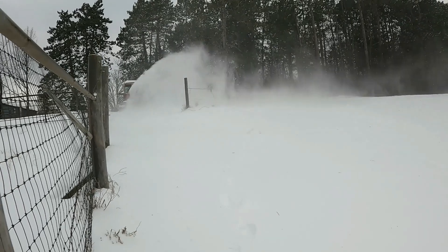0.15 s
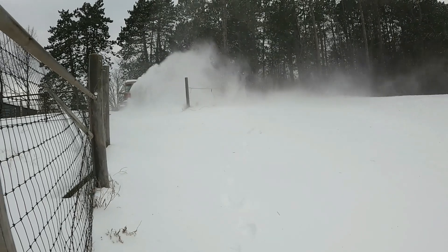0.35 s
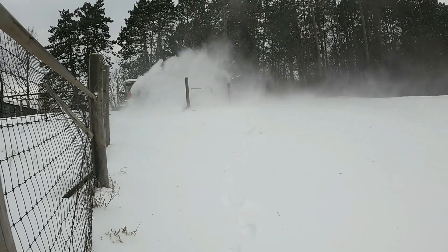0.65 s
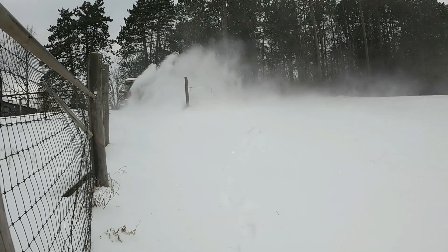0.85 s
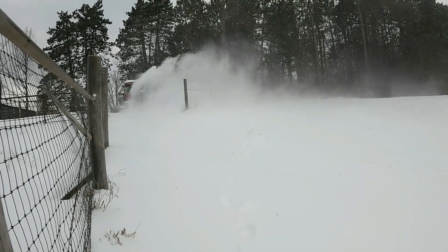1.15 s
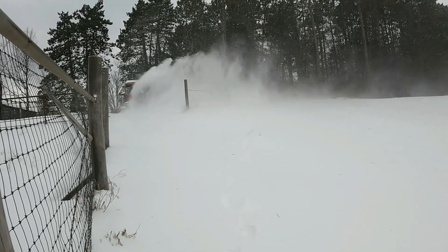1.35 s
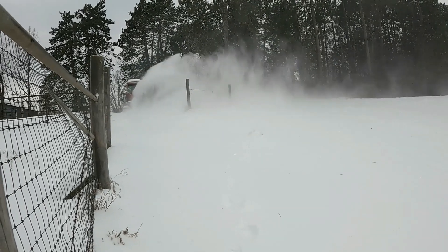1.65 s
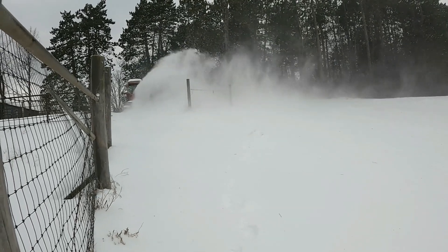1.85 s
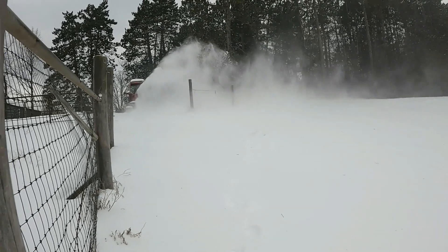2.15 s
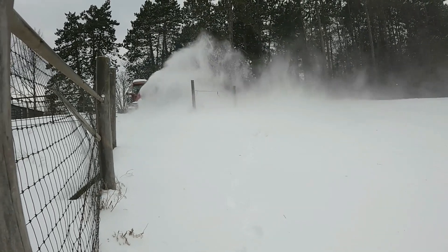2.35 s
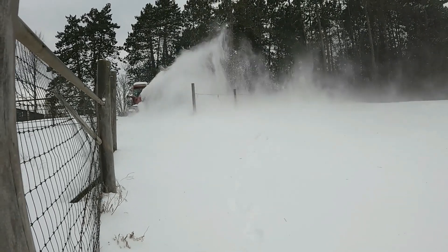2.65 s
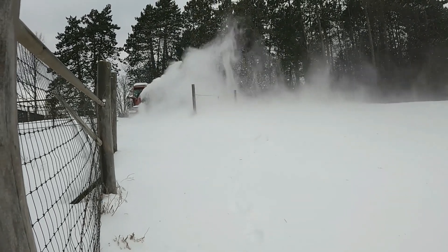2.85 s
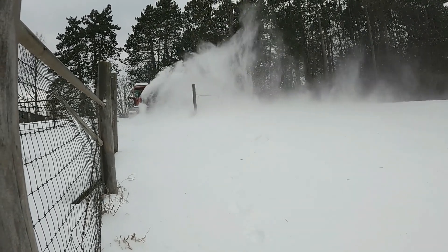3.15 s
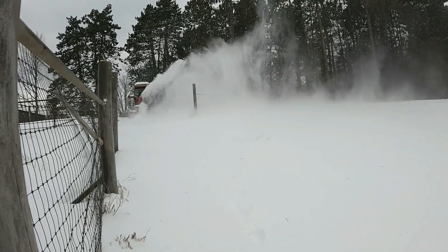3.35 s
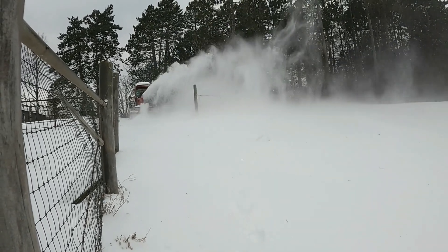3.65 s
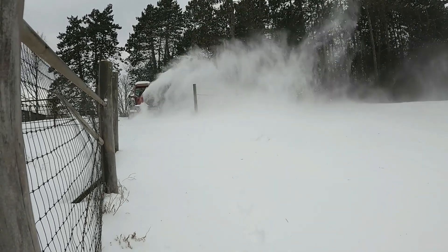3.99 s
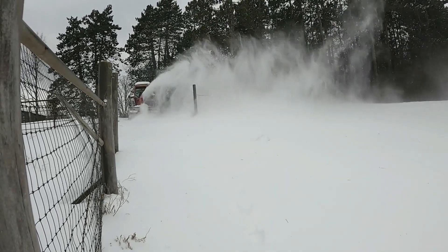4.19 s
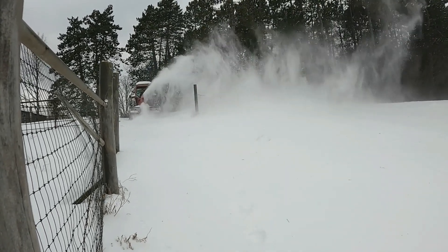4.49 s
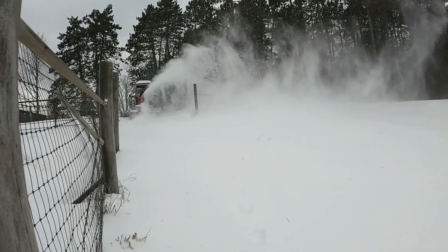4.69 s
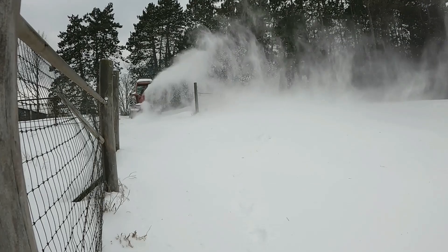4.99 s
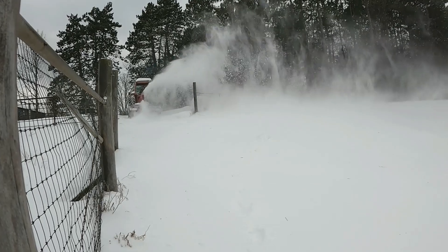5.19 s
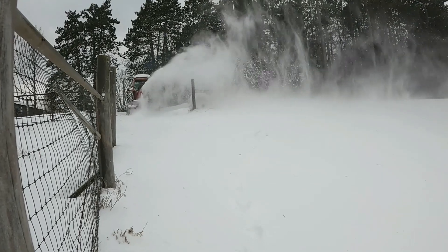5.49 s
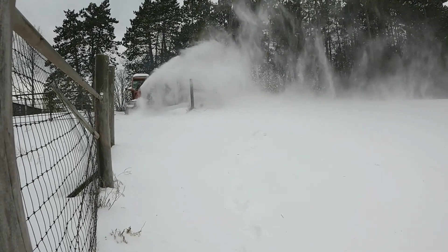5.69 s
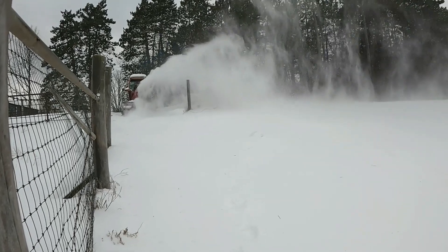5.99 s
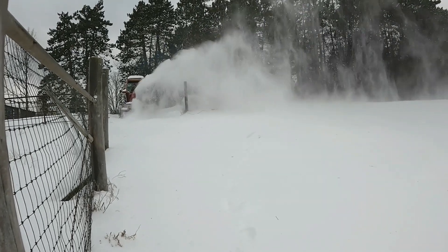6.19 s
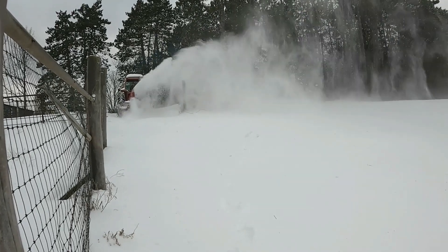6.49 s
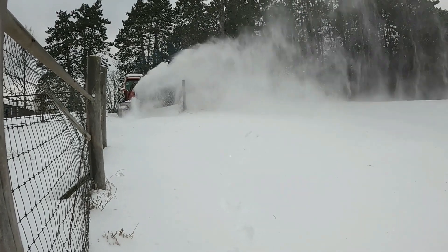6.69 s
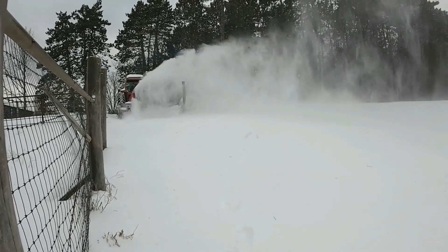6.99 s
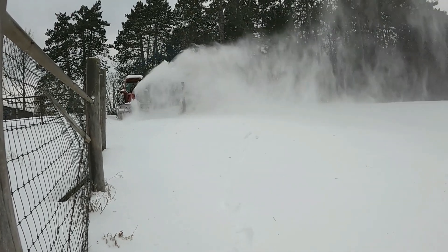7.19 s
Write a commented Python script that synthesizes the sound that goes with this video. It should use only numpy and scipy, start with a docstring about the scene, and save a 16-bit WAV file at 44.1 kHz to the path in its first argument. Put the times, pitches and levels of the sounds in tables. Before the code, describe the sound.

Steady low engine drone with a roaring snow blower some way off, wind thumps early on, metallic rattling growing busier near the end.

```python
"""A tractor's steady boom and whine, roaring and rattling as it blows snow across a field some way off.
The three-cylinder diesel is sines on multiples of its cycle, the exhaust boom on twice the firing rate;
one knock is a short pulse. Roar, snow spray and rumble are shaped noise; loose steel is clicks ringing
short modes. Wind buffets the microphones; one sharp tick sounds close by and the treble swells briefly.
The image is mono but for a faint hiss at first and opens out later."""
import sys
import numpy as np
from scipy import signal
from scipy.io import wavfile

SR = 44100
rng = np.random.default_rng(int(sys.argv[2]) if len(sys.argv) > 2 else 0)


def persist_wave(psi):
    """Save psi, clipped to +-1, as 16-bit WAV."""
    counts = np.round(np.clip(psi, -1, 1) * 32767).astype(np.int16)
    wavfile.write(sys.argv[1], SR, np.atleast_2d(counts).T)


N = 323694

BLOWER_TURNS_PER_CYCLE = .5117   # an engine cycle is two crank turns
LINE_UP_CYCLE = .27   # point of the cycle (0-1) where one cylinder fires hardest and its tones line up

# single pulses, wind thumps and one engine knock: peak t/s, peak level/dB, length/s
PULSES = [(0.472, -18.5, .03), (0.592, -17.5, .034), (0.905, -21, .016), (1.088, -17.5, .026),
          (1.15, -21, .016), (1.205, -15, .034), (1.226, -19, .005), (1.285, -20, .022), (1.334, -17, .018),
          (1.485, -20, .022), (1.675, -25, .006), (1.925, -26, .005)]
KNOCK_S = 1.226   # the row of PULSES that is the knock


def from_db(db):
    """Decibels to gain."""
    return 10 ** (np.asarray(db) / 20)


def rms_one(x):
    """Scale to unit rms."""
    return x / np.sqrt(np.mean(x ** 2) + 1e-20)


def in_time(rows):
    """Curve rows to one per-sample array per column after the time."""
    s, *columns = np.transpose(rows)
    return [np.interp(np.arange(N) / SR, s, c) for c in columns]


def at_hz(points, hz):
    """Read a spectrum on a log-frequency axis."""
    freqs, values = np.array(points).T
    return np.interp(np.log(hz), np.log(freqs), values)


def band_pass(x, low_hz, high_hz, order=2):
    """Butterworth band-pass."""
    return signal.sosfilt(signal.butter(order, [low_hz, high_hz], "band", fs=SR, output="sos"), x)


def bell(peak_s, length_s):
    """Gaussian swell of height 1; length is the full width at 1/e."""
    return np.exp(-(2 * (np.arange(N) / SR - peak_s) / length_s) ** 2)


def pulse(peak_s, peak_db, length_s):
    """A pressure pulse: a push between two pulls."""
    u = (2 * (np.arange(N) / SR - peak_s) / max(length_s, .002)) ** 2
    return from_db(peak_db) * (1 - 2 * u) * np.exp(-u)


def drift(rate_hz):
    """Slow chance: noise through a double one-pole low-pass, made every 64 samples, rms 1."""
    r = np.exp(-2 * np.pi * rate_hz * 64 / SR)
    slow = signal.lfilter([1], [1, -2 * r, r * r], rng.standard_normal(N // 64 + 2002))
    slow = slow[2000:]   # skip the filter's start
    return np.interp(np.arange(N) / 64, np.arange(len(slow)), rms_one(slow))


def ring(clicks, hz, t60_s):
    """A two-pole resonator: a unit click sets a dying sine of initial height 1 ringing."""
    r, w = from_db(-60 / (t60_s * SR)), 2 * np.pi * hz / SR
    return signal.lfilter([0, np.sin(w)], [1, -2 * r * np.cos(w), r * r], clicks + 1e-18)


def banded_noise(spectrum, patchy_db, patch_hz):
    """Third-octave bands of stereo noise, each with its own level, flicker and likeness; rms 1 in mono."""
    # left-right correlation: f/Hz, likeness
    likeness = [(20, 0.11), (60, 0.27), (120, 1), (200, 1), (350, 0.93), (500, 0.93), (2000, 0.83),
                (5000, 0.16), (7500, 0.3), (10000, .9)]
    bottom_hz, top_hz = spectrum[0][0], spectrum[-1][0]
    edges_hz = bottom_hz * 2 ** np.arange(0, np.log2(top_hz / bottom_hz) + .3, 1 / 3)
    out, together, white = 0, drift(patch_hz), rng.standard_normal((2, 2, N))
    for k, (low, high) in enumerate(zip(edges_hz, edges_hz[1:])):
        mid, side = band_pass(white[k % 2], low, high)
        hz = np.sqrt(low * high)
        alike = np.clip(at_hz(likeness, hz), -1, 1)
        flicker_db = patchy_db * (0.48 * together + drift(patch_hz))
        gain = from_db(at_hz(spectrum, hz) + flicker_db)
        out = out + gain * (np.sqrt(1 + alike) * mid + np.sqrt(1 - alike) * side * [[1], [-1]])
    return out / np.sqrt(np.mean(out.mean(0) ** 2))


def tones(turns, table, waver_db, waver_turns, scatter_cycles):
    """Multiples of a shaft rate, lined up once a turn but for a scatter; moving air makes each waver."""
    out = np.zeros(N)
    for multiple, level_db in table:
        wavering_turns = turns + waver_turns * drift(6.9)
        phase = 2 * np.pi * (multiple * wavering_turns + scatter_cycles * rng.standard_normal())
        out += np.sqrt(2) * from_db(level_db + waver_db * drift(4.14)) * np.cos(phase)
    return out


def hiss():
    """Faint high noise, independent in each channel."""
    # hiss level: t/s, level/dB
    hiss_level = [(0, -81), (2.5, -77), (5.0, -79.5), (5.6, -83), (7.34, -80)]
    noise = band_pass(rng.standard_normal((2, N)), 11000, 13500)
    return from_db(in_time(hiss_level)[0]) * rms_one(noise)


def treble_swell():
    """The treble swells faintly and briefly: bright noise under one bell."""
    noise = rms_one(band_pass(rng.standard_normal(N), 6500, 11500))
    return from_db(-66) * bell(peak_s=3.287, length_s=0.047) * noise


def gusty_breeze():
    """Low noise of air buffeting the ports: a lumpy breeze with bell-shaped gusts on top."""
    # gusts: peak t/s, peak level/dB, length/s
    gusts = [(0.1, -37, 0.26), (0.27, -32, 0.087), (0.477, -29, 0.081), (0.598, -28, 0.077),
             (0.885, -28, 0.14), (1.22, -28, 0.5), (1.59, -27, 0.053), (1.74, -34, 0.12), (2.05, -35, 0.21),
             (2.45, -32, 0.12), (2.84, -26, .08), (3.6, -30, 0.072), (3.85, -29, 0.15), (4.072, -27, 0.063),
             (4.3, -34, 0.12), (5.072, -32, 0.14), (5.9, -32.5, 0.99), (6.927, -33, 0.11),
             (7.005, -35, 0.6)]
    # buffet spectrum: f/Hz, relative density/dB
    buffet = [(6, -3.5), (25, 2), (40, -0.5), (60, -2), (90, -9.5), (150, -20), (260, -30), (400, -47.5)]
    breeze_db, lumps_db, lumps_hz = -38, 4, 14
    strength = from_db(breeze_db + lumps_db * drift(lumps_hz))
    for s, peak_db, length_s in gusts:
        strength += from_db(peak_db) * bell(s, max(length_s, .02))
    return strength * banded_noise(buffet, patchy_db=1.5, patch_hz=7.2)


def wind_thumps():
    """Single pressure pulses of wind on the ports."""
    return sum(pulse(*row) for row in PULSES if row[0] != KNOCK_S)


def right_flutter():
    """Bell-shaped bursts of low noise where wind catches the right port alone."""
    # flutters: peak t/s, peak level/dB, length/s
    flutters = [(5.7, -48, .3), (6.05, -32, 0.084), (6.2, -32, 0.17), (7.0, -37, .12), (7.22, -29.5, 0.27)]
    swell = sum(from_db(peak_db) * bell(s, max(length_s, .02)) for s, peak_db, length_s in flutters)
    noise = rms_one(band_pass(rng.standard_normal(N), 50, 260))
    return swell * noise * [[0], [1]]


def wind():
    """All moving air at the ports: breeze and gusts, thumps, flutters."""
    return wind_thumps() + right_flutter() + gusty_breeze()


def tick():
    """Touches close by: clicks with dying crackle ring modes near 5 kHz; faint bright edge."""
    # light touches, main tick, bounce: t/s, click level/dB, fade/s
    touches = [(3.258, -29, .006), (3.2645, -34, .012), (3.2805, -29, .002), (3.2831, -15, .003),
               (3.2893, -20, .0025)]
    # modes: f/Hz, relative level/dB, t60/s
    modes = [(2500, -8, .0015), (3700, -3, .0012), (4800, 0, .0012), (5800, -3.5, .0012), (7200, -11, .001)]
    edge_db = -46
    t, crackle = np.arange(N) / SR, np.zeros(N)
    grit = rng.choice([-1, 1], N) * (rng.random(N) < .3) * .45
    for s, level_db, fade_s in touches:
        crackle += from_db(level_db) * (t > s) * np.exp(-np.abs(t - s) / fade_s) * grit
        crackle[int(s * SR)] += from_db(level_db)
    body = np.zeros(N)
    for k, (hz, level_db, t60_s) in enumerate(modes):
        body += from_db(level_db) * ring(crackle, hz, t60_s) * (-1) ** k   # alternating sign
    body = band_pass(body, 2000, 7500)
    return body + from_db(edge_db) * np.diff(crackle, prepend=0)


def patter():
    """Ice in the chute: sparse grains of uneven size, each a short click near 4 kHz."""
    # grain strength ahead of the band-pass: t/s, level/dB
    grain_level = [(0, -36), (5, -33), (6.3, -27), (7.34, -27)]
    grains_per_s, uneven_db = 70, 3.0
    hits = rng.random(N) < grains_per_s / SR
    grains = hits * from_db(in_time(grain_level)[0] + uneven_db * rng.standard_normal(N))
    return band_pass(grains + 1e-18, 3300, 5200)


def rattle(blower_turns, spray_db):
    """Loose steel: dense random clicks ring its modes, weakly every blower turn, with loud bursts and cracks."""
    # loud bursts: t/s, burst level/dB, crack level/dB, crack top f/Hz, upper modes re lower/dB
    bursts = [(0.918, -32, -40, 5000, 0), (1.68, -34, -42, 5000, 2), (2.9921, -38, -40, 5000, 0),
              (3.8267, -38, -40, 5000, 0), (4.3221, -38, -40, 5000, 0), (4.4134, -36, -40, 6000, 0),
              (5.605, -34, -46, 4200, -8), (5.69, -37, -46, 4200, -8), (5.7723, -35, -44, 4200, -8),
              (5.797, -36, -46, 5000, -1), (5.888, -32, -38, 4200, -8), (5.98, -33, -44, 4200, -8),
              (6.0801, -33, -42, 5000, 0), (6.193, -35, -42, 4500, -5), (6.372, -36, -44, 5000, -2),
              (6.4662, -34, -30, 6500, 3), (6.483, -38, -34, 5200, 2), (6.5625, -31, -40, 4500, -4),
              (6.586, -40, -31, 6500, 3), (6.7575, -39, -36, 5200, 7), (6.8568, -32, -32.5, 8200, -3),
              (6.871, -40, -36, 6200, 2), (6.9636, -34, -38, 5000, -2), (7.053, -38, -40, 5000, 4),
              (7.1636, -37, -31, 5500, 6), (7.258, -38, -38, 5500, 4)]
    # steel modes: f/Hz, relative level/dB, t60/s
    steel = [(2540, -10, 0.016), (3380, -6, 0.011), (3570, 0, 0.016), (3820, -5.5, 0.02), (4250, -9, 0.013),
             (4640, -3.5, 0.014), (4800, -6, 0.012), (5200, -9.5, 0.0088), (5600, -11, 0.0081),
             (7100, -13.5, 0.0079)]
    chatter_db, follows_spray, chatter_waver_db = -58.5, 0.83, 2.0
    drive_db, fade_s, crack_fade_s = -17, 0.021, .0022   # drive: touch strength under the burst level
    upper_hz, touches_per_s = 4000, 4000
    t = np.arange(SR // 5) / SR
    chatter_db = chatter_db + follows_spray * (spray_db - spray_db.mean()) + chatter_waver_db * drift(3.9)
    lower = from_db(chatter_db) * np.exp(-((blower_turns + 0.22) % 1) / 0.37)
    upper, cracks = lower.copy(), np.zeros(N)
    for s, level_db, crack_db, top_hz, upper_db in bursts:
        i = int(s * SR)
        crack = from_db(crack_db) * np.exp(-t / crack_fade_s) * rng.choice([-1, 1], len(t))
        cracks[i:i + len(t)] += band_pass(crack + 1e-18, 3200, top_hz, order=3)[:N - i]
        fade = (from_db(level_db + drive_db) * np.exp(-t / fade_s))[:N - i]
        lower[i:i + len(t)] += fade
        upper[i:i + len(t)] += from_db(upper_db) * fade
    touches = rng.choice([-1, 1], N) * (rng.random(N) < touches_per_s / SR)
    clatter = np.zeros(N)
    for hz, level_db, t60_s in steel:
        drive = upper if hz > upper_hz else lower
        clatter += from_db(level_db) * ring(drive * touches * rng.standard_normal(N), hz, t60_s)
    # the air takes the very top; distance dulls the clatter
    cracks = signal.sosfilt(signal.butter(8, 8400, fs=SR, output="sos"), cracks + 1e-18)
    return cracks + signal.sosfilt(signal.butter(2, 6500, fs=SR, output="sos"), clatter)


def snow_spray(spray_db):
    """Thrown snow: bright flickering noise, most of it at 2.5-6 kHz."""
    # spray spectrum: f/Hz, relative density/dB
    spectrum = [(1530, -23), (2600, -5), (4210, -7.5), (5690, -16), (6140, -14), (7980, -39), (13500, -120)]
    return from_db(spray_db) * banded_noise(spectrum, patchy_db=1.18, patch_hz=17)


def rumble():
    """Low mono noise of the machine, flickering about a constant level."""
    # rumble spectrum: f/Hz, relative density/dB
    spectrum = [(24, -7), (40, -0.5), (65, 3.5), (100, 0), (140, -13), (190, -24.5)]
    return from_db(-30.5) * banded_noise(spectrum, patchy_db=1.5, patch_hz=4.4).mean(0)


def hollow(x):
    """Cut or lift narrow bands, likely ground echoes and the chute, to a depth that varies."""
    # hollows and ridges: f/Hz, width/Hz, gain at full depth/dB
    dips = [(380, 36, -7), (1438, 220, -4.5), (1670, 130, 2), (2032, 120, -9), (2170, 180, 4)]
    # depth as the machine moves: t/s, share 0-1
    depth_curve = [(0, 0.9), (1.0, 0.86), (1.6, 1), (2.2, 0.55), (2.8, 0.95), (3.6, 0.8), (4.6, 0.8),
                   (5.5, 0.6), (6.4, 0.5), (7.34, 0.6)]
    depth = np.clip(in_time(depth_curve)[0], 0, 1)
    for hz, width_hz, gain_db in dips:
        r, c = np.exp(-np.pi * width_hz / SR), np.cos(2 * np.pi * hz / SR)
        band = signal.lfilter((1 - r * r) / 2 * np.array([1, 0, -1]), [1, -2 * r * c, r * r], x)
        x = x + depth * (from_db(gain_db) - 1) * band
    return x


def machine_roar(cycles, roar_db, rush_db):
    """Broad noise with hollows, pulsing with the firings; its part above 1.4 kHz swells on its own."""
    # roar spectrum: f/Hz, relative density/dB
    spectrum = [(76, -25), (130, -12), (149, -19), (172, -31.5), (231, -22.5), (390, -28), (464, -21.5),
                (560, -28.5), (658, -25.5), (1100, -27), (1410, -30.5), (1660, -29), (2000, -37),
                (2290, -32), (3200, -49), (4160, -73.5), (7040, -120)]
    firing = 1 + .06 * np.cos(2 * np.pi * 3.0 * cycles)   # three firings a cycle
    roar = from_db(roar_db) * firing * hollow(banded_noise(spectrum, patchy_db=0.9, patch_hz=7.5))
    rush = signal.sosfilt(signal.butter(2, 1400, "high", fs=SR, output="sos"), roar)
    return roar + (from_db(rush_db - rush_db.mean()) - 1) * rush


def engine_knock():
    """One short pressure pulse from the engine."""
    return sum(pulse(*row) for row in PULSES if row[0] == KNOCK_S)


def surges(cycles):
    """Engine tones that surge: each a slightly wavering sine under a row of bell-shaped swells."""
    # surges: engine-cycle multiple (groups rows; rounded for pitch), peak t/s, peak level/dB rms, length/s
    surge_rows = [(14.97, .3, -44.5, .5), (15.05, 1.25, -49.5, .25), (14.97, 2.85, -43.5, 0.21),
                  (15.01, 1.9, -46.5, .6), (15, 3.5, -42, .35), (15, 4.1, -46.5, .3),
                  (15.04, 4.6, -43.5, 0.44), (15.04, 5.1, -43.5, 0.44), (15, 5.89, -44.5, .5),
                  (15, 6.6, -45.5, .3), (15, 6.4, -45.5, .3), (24, 2.02, -45, 0.43), (24, 2.74, -49, .3),
                  (24, 4.75, -45, 0.33), (24, 5.5, -47, .3), (24, 6.0, -49, .4), (24, 7.0, -48, 0.55),
                  (25.05, 1.5, -47.5, 0.27), (25, 2.15, -46.5, .45), (25, 3.7, -52, .4),
                  (25.05, 4.75, -45, 0.35), (25.03, 5.5, -47.5, .3), (24.96, 6.2, -49, .8),
                  (25, 7.0, -44.5, .3), (56, 0.62, -48.5, .6), (56, 1.3, -51.5, .5), (56, 2.0, -50, 1.2),
                  (56, 3.5, -50.5, 1.4), (56, 5.8, -50, .7), (56, 6.6, -50, .9), (56, 7.3, -47, .5),
                  (113, 2.2, -50.5, 1.1), (112.7, 3.4, -53, 0.59), (111.4, 6.0, -55.5, .3),
                  (111.4, 6.88, -53, .6)]
    out = np.zeros(N)
    for multiple in sorted({row[0] for row in surge_rows}):
        swell = sum(from_db(level_db) * bell(s, max(length_s, .1))
                    for k, s, level_db, length_s in surge_rows if k == multiple)
        out += swell * tones(cycles - LINE_UP_CYCLE, [(round(multiple), 0)],
                             waver_db=1.0, waver_turns=.0005, scatter_cycles=.12)
    return out


def drone():
    """Sines locked to the engine: clean exhaust boom, weaker engine, paddle and gear tones; also the angle."""
    # engine speed and exhaust strength: t/s, boom f/Hz, boom level/dB rms
    exhaust = [(0.0, 118.35, -21.9), (0.45, 118.4, -21.8), (0.9, 119.02, -23.1), (1.5, 119.79, -25.5),
               (1.8, 119.87, -24.4), (2.4, 119.73, -21.3), (3.0, 119.42, -20.8), (3.5, 119.15, -20.4),
               (4.2, 119.23, -20.9), (4.6, 119.48, -20.5), (5.4, 119.6, -20.0), (6.2, 119.59, -20.2),
               (6.8, 119.8, -20.7), (7.34, 119.88, -21.1)]
    # engine tones: engine-cycle multiple, level/dB rms
    engine_tones = [(3, -37), (5, -47.5), (7, -56.5), (8, -59.5), (10, -57.5), (11, -54), (13, -55.5),
                    (16, -57), (17, -54.5), (18, -56.5), (19, -58), (20, -60.5), (22, -56.5), (26, -61),
                    (28, -63), (31, -63), (33, -55), (35, -56), (37, -62), (38, -61), (39, -57),
                    (40, -60.5), (46, -59.5), (47, -63), (51, -57.5), (60, -64.5)]
    # steadier engine tones: engine-cycle multiple, level/dB rms
    firing_tones = [(9, -44), (12, -42.5), (14, -52)]
    # paddles and drive gear: blower-shaft multiple, level/dB rms
    blower_tones = [(9, -42), (15, -59.5), (20, -54.5), (21, -47.5), (23, -61.5), (24, -59), (30, -58),
                    (42, -59), (63, -52.5), (96, -62), (100, -61), (105, -56.5), (115, -56.5), (126, -56),
                    (230, -63.5)]
    # separate swells of the hum near 460 Hz: t/s, level/dB rms
    hum_swell = [(0.1, -46), (0.5, -61), (1.2, -65), (1.45, -42.5), (2.0, -59.5), (2.3, -45.5),
                 (2.75, -55.5), (3.2, -45.5), (3.5, -62), (3.77, -46), (4.07, -59), (4.55, -44.5),
                 (5.0, -62), (5.22, -41), (5.6, -60), (6.03, -41), (6.5, -51), (6.75, -38.5), (7.05, -49),
                 (7.34, -46)]
    boom_order, hum_order = 6, 23   # multiples of the engine cycle
    boom_hz, boom_db = in_time(exhaust)
    cycles = np.cumsum(boom_hz) / SR / boom_order
    boom_gain = np.sqrt(2) * from_db(boom_db + 0.36 * drift(4.4))
    boom = boom_gain * np.sin(2 * np.pi * boom_order * cycles)
    lined_up, blower_turns = cycles - LINE_UP_CYCLE, cycles * BLOWER_TURNS_PER_CYCLE
    whine = tones(lined_up, engine_tones, waver_db=3.0, waver_turns=.0007, scatter_cycles=.12)
    whine += tones(lined_up, firing_tones, waver_db=1.2, waver_turns=.0005, scatter_cycles=.12)
    whine += tones(blower_turns, blower_tones, waver_db=4.0, waver_turns=.0006, scatter_cycles=1)
    whine *= from_db(0.99 * (boom_db - boom_db.mean()))   # these swell with the boom
    hum = tones(cycles, [(hum_order, 0)], waver_db=0.5, waver_turns=0.00064, scatter_cycles=0.9)
    whine += from_db(in_time(hum_swell)[0]) * hum
    return boom, whine + surges(cycles), cycles


def scene():
    """Sum of all sources; whine, patter and rattle sit a little to the left."""
    # machine noises as it creeps nearer: t/s, roar/dB, rush above 1.4 kHz/dB (about its mean), spray/dB
    tractor = [(0.0, -34, -3, -47), (0.9, -34, -4, -48), (1.4, -34.5, -9, -47.5), (1.8, -33, -5.5, -46.5),
               (2.3, -33, -3.5, -47), (2.9, -35, -4.5, -46), (3.6, -33.5, -7, -46), (4.2, -34.5, -4.5, -47),
               (4.7, -33, -4.5, -46), (5.15, -34, -9, -46), (5.6, -33.5, -5, -47),
               (6.2, -32.5, -7.5, -45.5), (6.9, -32.5, -3.5, -45.5), (7.34, -32, -7.5, -44)]
    roar_db, rush_db, spray_db = in_time(tractor)
    boom, whine, cycles = drone()
    roar = machine_roar(cycles, roar_db, rush_db)
    left_of_centre = whine + patter() + rattle(cycles * BLOWER_TURNS_PER_CYCLE, spray_db)
    machine = boom + rumble() + left_of_centre * from_db([[1.5], [-1.5]]) + roar + snow_spray(spray_db)
    return machine + engine_knock() + wind() + tick() + treble_swell()


def record(dry):
    """Fade the side signal in late, add hiss to each channel, cut the top."""
    opens_s, opening_s, open_db, cutoff_hz = 4.9, 1.2, -3.5, 15600
    since_s = np.maximum(np.arange(N) / SR - opens_s, 0)
    width = from_db(open_db) * (1 - np.exp(-since_s / opening_s)) ** 1.55
    mid = (dry[0] + dry[1]) / 2
    side = (dry[0] - dry[1]) / 2 * width
    out = np.array([mid + side, mid - side]) + hiss()
    return signal.sosfilt(signal.cheby2(12, 70, cutoff_hz, fs=SR, output="sos"), out)


dry = scene()
out = record(dry)
persist_wave(out)
```